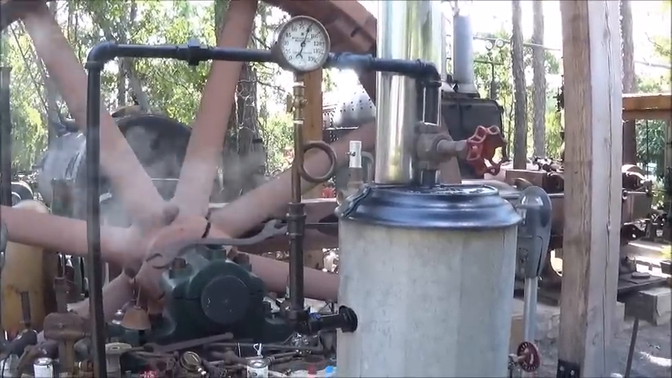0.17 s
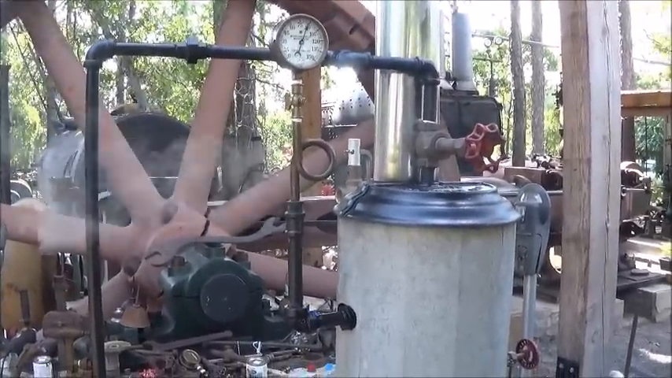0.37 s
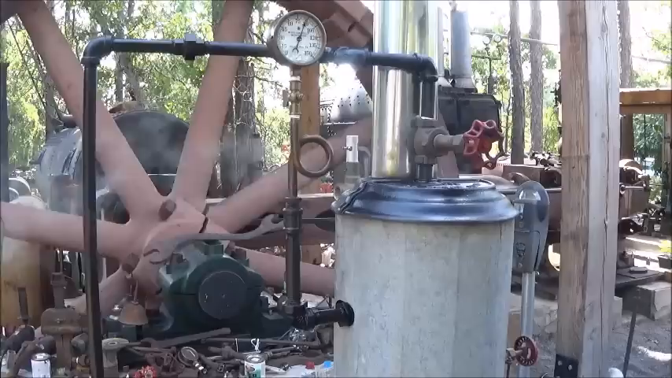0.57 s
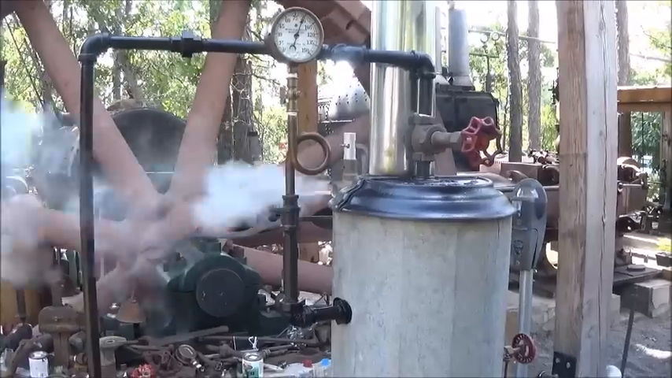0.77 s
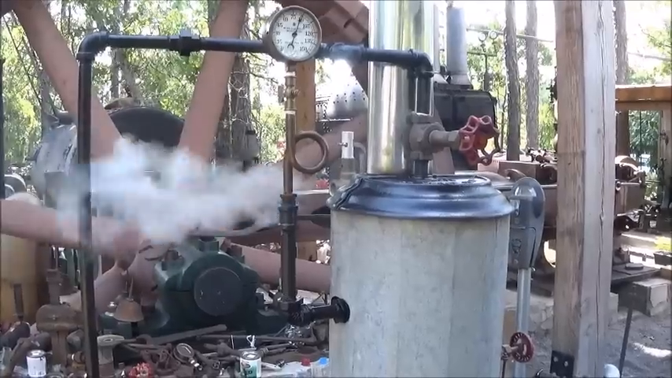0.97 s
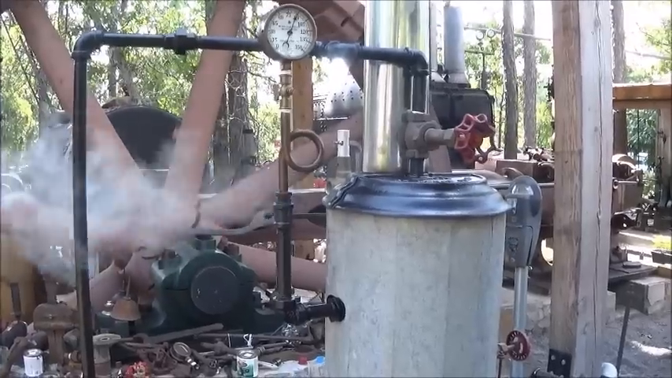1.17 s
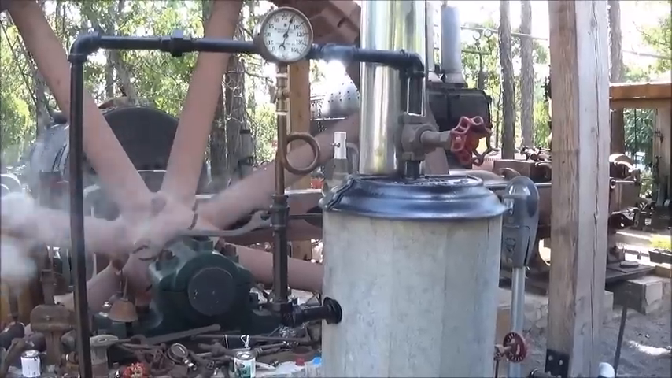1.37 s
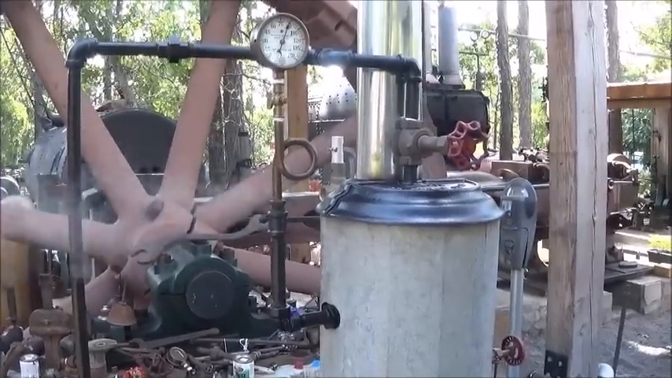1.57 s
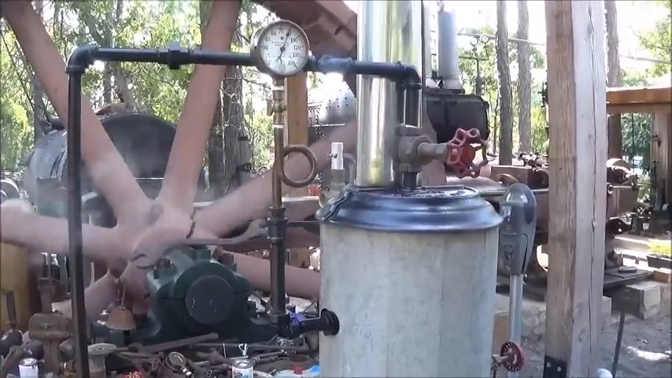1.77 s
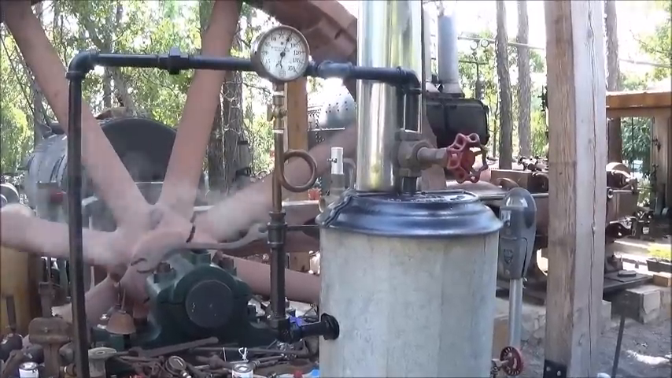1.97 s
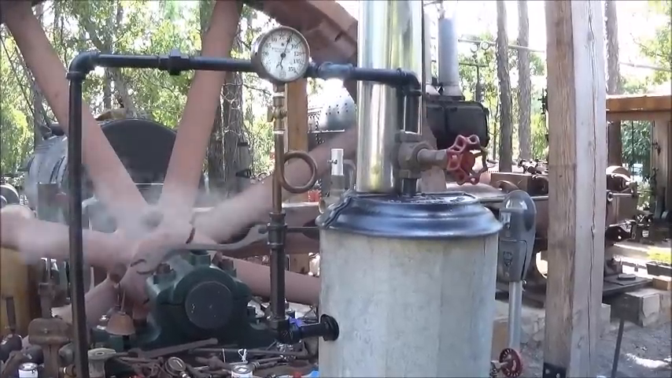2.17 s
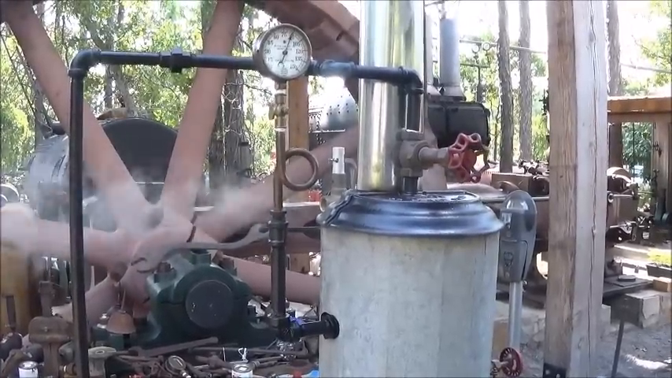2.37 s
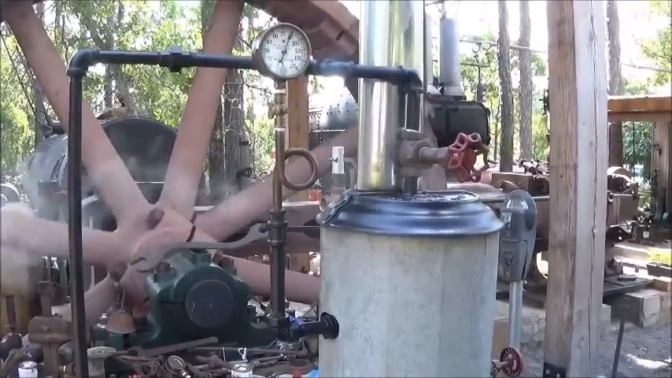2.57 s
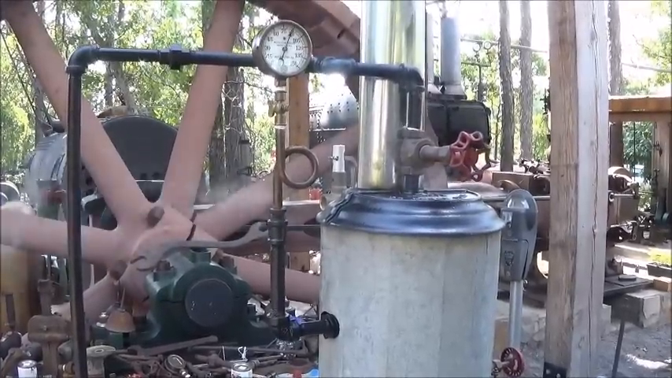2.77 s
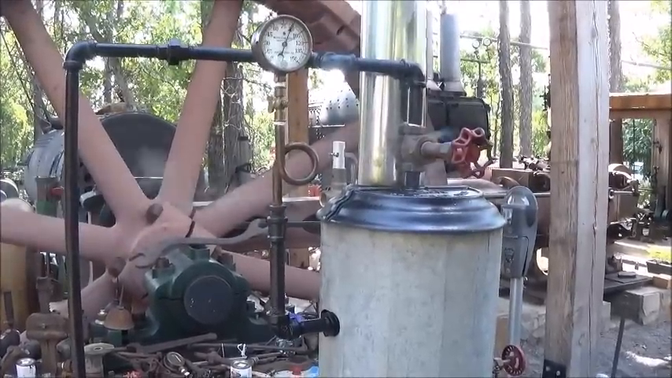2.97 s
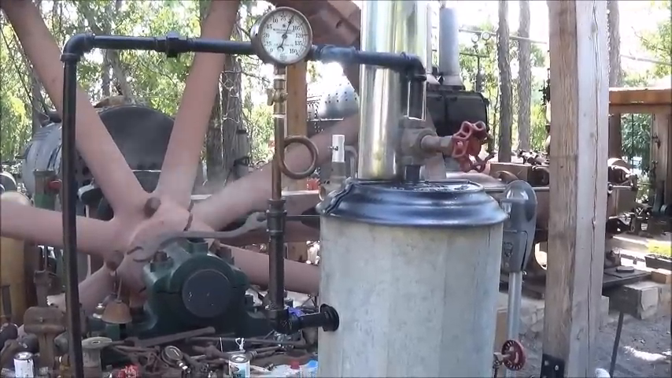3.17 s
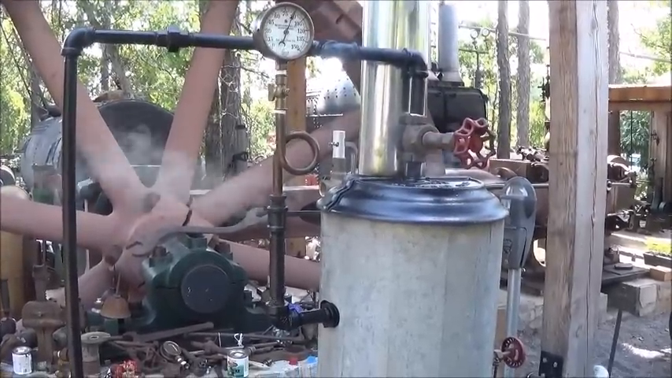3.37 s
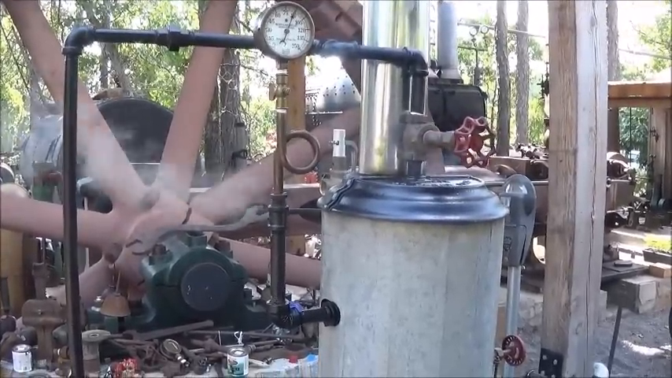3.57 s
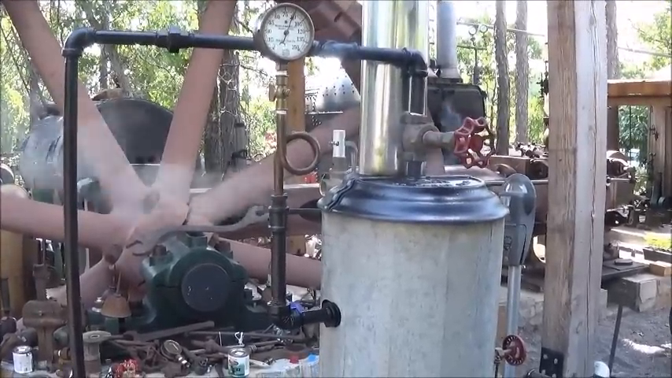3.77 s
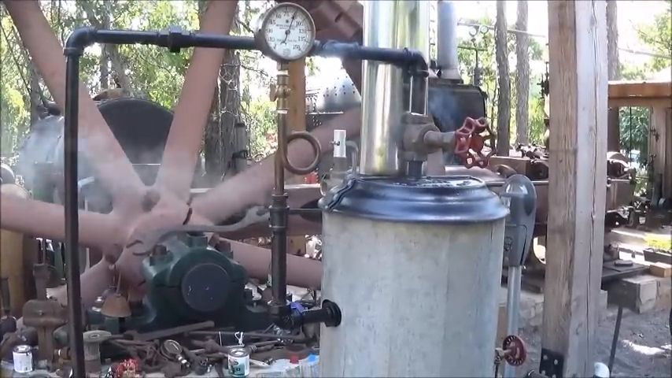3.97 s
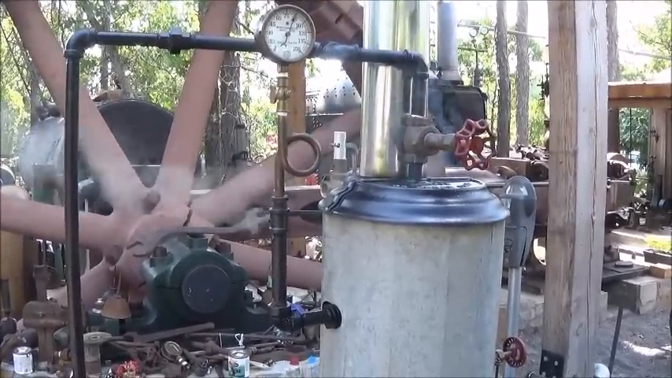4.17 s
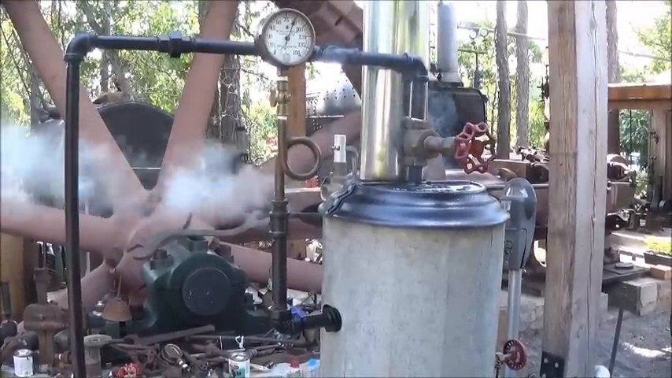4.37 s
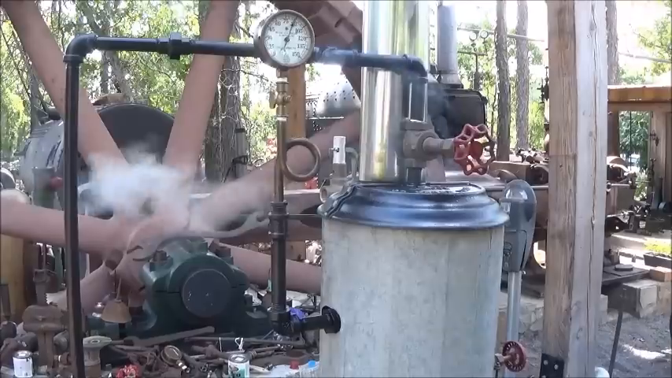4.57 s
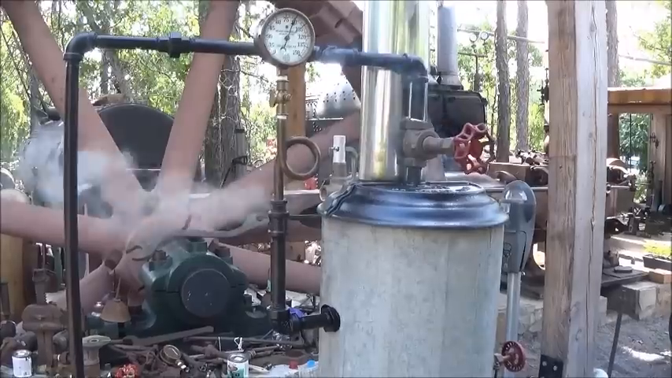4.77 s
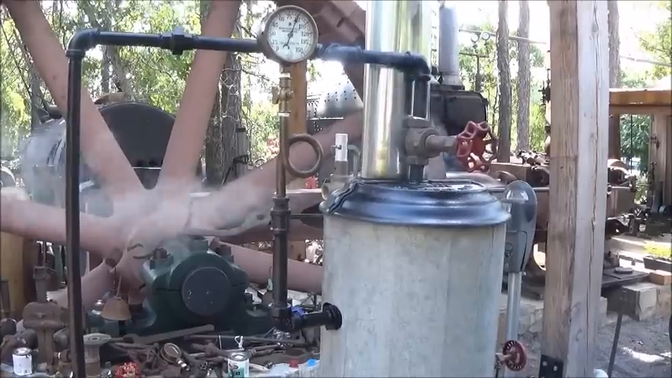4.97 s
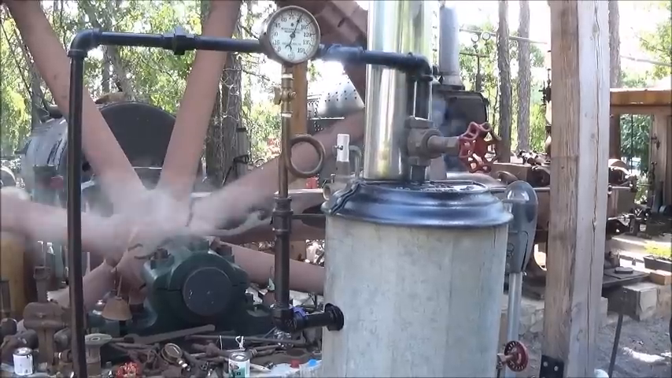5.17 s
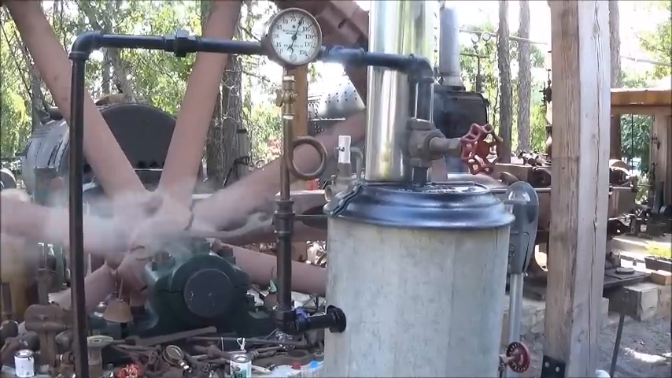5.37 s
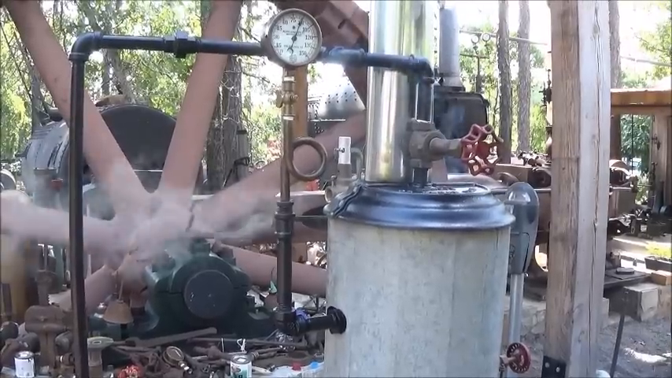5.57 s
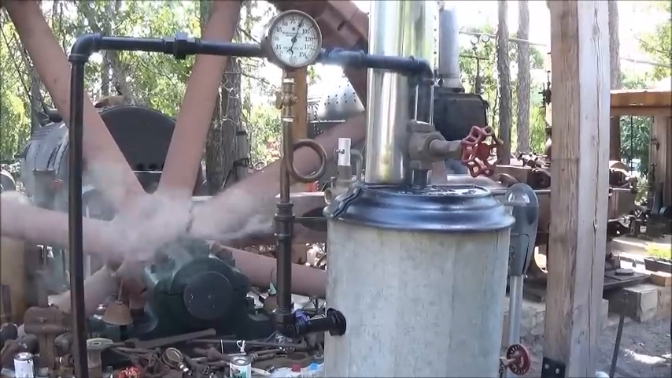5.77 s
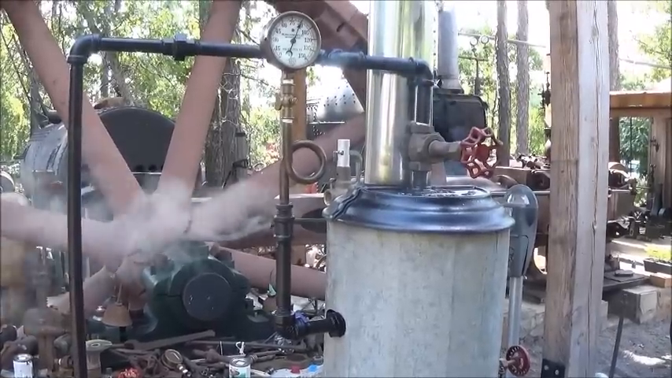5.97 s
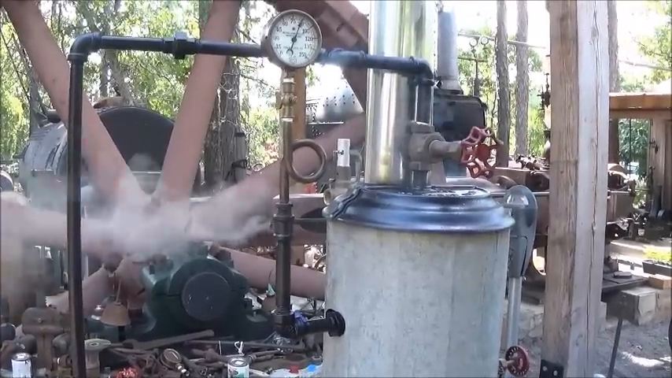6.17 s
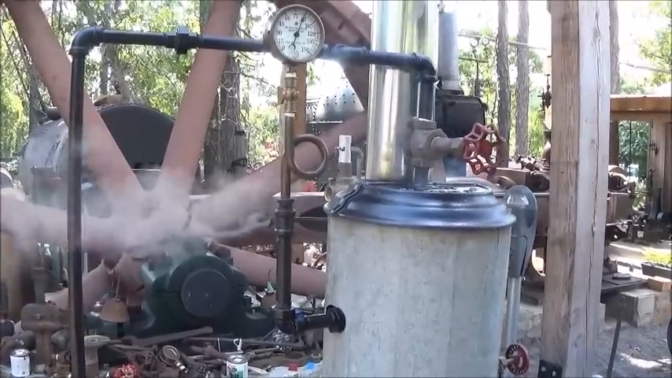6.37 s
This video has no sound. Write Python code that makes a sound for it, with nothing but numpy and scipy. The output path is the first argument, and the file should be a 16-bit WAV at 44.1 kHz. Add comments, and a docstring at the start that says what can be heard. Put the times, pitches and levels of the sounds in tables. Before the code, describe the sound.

Close stereo sound of pressurised steam rushing through a short pipe outdoors, dense and sizzling throughout. It starts drier, then a rapid cluster of popping, splashing spits wets the jet and adds airy fizz. The firebox roar swells briefly past the middle, followed by a loud double spit. Hiss continues to the end over a faint hum, with short echoes from nearby metal.

```python
"""In an open yard of old machines, a small boiler's safety valve blows steam through a short outlet pipe.
From the start filtered noise hisses in the pipe's resonances, over a soft fire of noise and a low hum of sines.
From 0.7 to 1 s five slugs of water spit out with cracks, splashes, puffs and rings, and fine spray then sizzles.
The fire's roar swells near 3.8 s, and two more slugs leave at 4.3 s.
Metal close by throws back quick echoes, and two close microphone ports hear it all."""
import sys
import numpy as np
from scipy import signal
from scipy.fft import rfft, irfft
from scipy.io import wavfile
from scipy.ndimage import uniform_filter1d

SR = 44100
rng = np.random.default_rng(int(sys.argv[2]) if len(sys.argv) > 2 else 0)


def bounce(signal):
    """Save signal as a 16-bit WAV file at the path given by the first command-line argument."""
    frames = np.transpose(np.atleast_2d(signal))
    limited = np.clip(frames, -1, 1)
    pcm = np.round(limited * 32767).astype(np.int16)
    wavfile.write(sys.argv[1], SR, pcm)


N = 283122
TIME = np.arange(N) / SR
BINS = np.fft.rfftfreq(N, 1 / SR)

# the boiler's rumble and hum, before the trim of each: t/s, level/dB
DRONE = [(0, -44), (1.2, -44), (1.9, -45.5), (2.2, -41), (3.1, -47), (4.5, -44), (5.1, -45), (5.8, -47),
         (6.42, -39)]
# slugs of water leaving the outlet: t/s, crack level/dB, splash level/dB, gurgle and ring level/dB,
# puff level/dB, time to clear the pipe/s, middle of the splash f/Hz
SLUGS = [(0.698, -17, -38, -49, -40, 0.0056, 2600), (0.7567, -15.5, -17.5, -34, -23, 0.021, 4230),
         (.793, -21, -21.5, -29, -35, 0.018, 3200), (.9455, -15.5, -20, -38, -23, 0.0042, 2300),
         (.992, -16.5, -32.5, -38, -35.5, 0.0059, 1700), (4.305, -11, -24.5, -28.5, -18, .021, 1970),
         (4.352, -20, -36, -35, -41, .005, 1500)]


def amp(db):
    """Decibels to gain."""
    return 10 ** (np.asarray(db) / 20)


def unit(x):
    """Scales to rms 1."""
    return x / np.sqrt(np.mean(np.abs(x) ** 2) + 1e-20)


def read(points, hz):
    """Reads a spectrum on a log-frequency axis."""
    f, value = np.transpose(points)
    return np.interp(np.log(hz + 1), np.log(f + 1), value)


def follow(table, t):
    """Every column of a curve table at the times t."""
    s, *columns = np.transpose(table)
    return [np.interp(t, s, column) for column in columns]


def bell(f, hz, width):
    """Gain of a resonance, half its peak at the edges of the width."""
    return 1 / (1 + (2 * (f - hz) / width) ** 2)


def waver(rate_hz):
    """Slow chance of rms 1, up to about the given rate."""
    spectrum = rfft(rng.standard_normal(N))
    return unit(irfft(spectrum / (1 + (BINS / rate_hz) ** 4), N))


def patches(shape, count, size):
    """Random patches of rms 1, count frames long and size bins wide."""
    over_time = uniform_filter1d(rng.standard_normal(shape), count, axis=0)
    return unit(uniform_filter1d(over_time, size, axis=1))


def jet(rush_db=-27.0, sizzle_db=-24.5, fizz_db=-29.5, patchy_db=1.13, flutter_db=.5, gust_db=1.0,
        tremble_db=0.2, rush_per_third=-.3, bright_per_third=0.55, fizz_per_spray=0.81, pipe_choke=1.0):
    """Turbulence at the valve seat: a broad rush, the pipe's resonances and a sizzle of droplets."""
    # resonances of the outlet pipe once wet: f/Hz, width/Hz
    pipe = [(1782, 220), (4790, 900), (8314, 1400), (13700, 950)]
    # their usual levels before the swells: level/dB
    pipe_db = [-35.5, -27.5, -22.5, -33]
    # spectrum shapes of the rush, the coarse spray and the fine spray: f/Hz, relative level/dB per Hz
    rush_colour = [(150, -17.5), (400, -15.5), (700, -12.5), (1200, -10), (1330, -11.5), (1500, -1.5),
                   (2400, 1.5), (3500, -4.5), (6000, -4), (7000, -9), (16000, -39)]
    sizzle_colour = [(6000, -32), (8000, -2), (9300, -2.5), (10100, 4.5), (11000, 4), (11900, 1.5),
                     (12500, -1), (13600, -12), (16000, -24)]
    fizz_colour = [(9000, -30), (11500, -9), (12600, -2), (13800, -2), (14500, 0), (15200, 2.5), (15800, 0)]
    # fine spray carried by the steam, before the share each layer takes: t/s, level/dB against the usual
    fine_spray = [(0.0, -11), (0.82, -14), (0.88, 1), (1.06, -3.8), (1.12, 7), (1.62, 1), (1.78, 7),
                  (2.04, 0), (2.5, 6), (2.86, 2), (4.0, 8.5), (4.68, 1), (4.78, 7), (5.08, -4.5), (5.34, 7),
                  (5.52, -4.5), (5.58, 5), (6.4, 6)]
    # swell of the coarse sizzle: t/s, level/dB against the usual
    sizzle_curve = [(0, -1.0), (0.18, -5), (1.1, -4.5), (1.19, 0.8), (1.62, -1.2), (1.76, 1.5),
                    (2.02, -0.5), (2.5, 2.0), (2.7, -1), (3.3, -1), (3.7, 1), (4.05, -0.8), (4.18, -1),
                    (4.83, 2), (5.12, -2.3), (5.32, 0.6), (6.42, 1.5)]
    # swell of the pipe's second resonance: t/s, level/dB against the usual
    second_curve = [(0, 2.2), (0.6, 0.5), (0.87, -3.7), (1.5, -2), (2.17, 1.5), (2.38, -3.5), (2.46, -2.5),
                    (3.05, -0.2), (3.5, -0.5), (3.72, -2.2), (4.22, 0), (4.7, -0.7), (5.2, -2.5), (5.8, -1),
                    (6.12, -2.5), (6.42, 1.5)]
    # swell of the pipe's third and strongest resonance: t/s, level/dB against the usual
    third_curve = [(0, 1.3), (0.6, 0.1), (1.25, 0), (1.45, 0.6), (1.95, -0.8), (2.28, 1), (2.45, -0.2),
                   (3.6, -1.4), (4.15, -0.6), (4.38, -1.5), (4.8, -3.5), (4.92, 2), (5.2, 0), (5.5, 0.9),
                   (5.92, 0.3), (6.07, -5), (6.2, 0), (6.42, -4.5)]
    # the steam is dry until the first slugs wet the pipe: weaker, brighter rush and higher resonances
    wetting_s, wetting_spread_s = 1, 0.6
    dry_rush_db, dry_bright_db, dry_sharpening = -3, 14, .018
    # dB that the lowest resonance gains per dB of sizzle, and the top one per dB of spray
    first_per_sizzle, top_per_spray = 0.46, 0.43

    f = np.fft.rfftfreq(512, 1 / SR)
    t = (np.arange(N // 128 + 3) * 128 / SR)[:, None]  # one row per short frame
    curves = (fine_spray, sizzle_curve, second_curve, third_curve)
    spray, sizzle, second, third = (follow(curve, t)[0] for curve in curves)
    choke = choking(t)
    dryness = .5 - .5 * np.tanh((t - wetting_s) / wetting_spread_s)

    def flutter(count):
        """Random level sway shared by all bins."""
        return patches((len(t), 1), count=count, size=1)

    # the rush is thinner and brighter when the steam is dry or the third resonance takes over
    rush = rush_db + dry_rush_db * dryness + rush_per_third * third + tremble_db * flutter(count=30)
    bright = dry_bright_db * dryness + bright_per_third * third
    tilt = bright * read([(3500, 0.0076), (5800, 0.51)], f)
    power = (unit(amp(read(rush_colour, f))) * amp(rush + tilt)) ** 2

    # coarse spray sizzles, fine spray fizzes above it
    fizz = fizz_per_spray * spray + fizz_db
    for colour, level in ((sizzle_colour, sizzle + sizzle_db), (fizz_colour, fizz)):
        power += (unit(amp(read(colour, f))) * amp(level)) ** 2

    # each resonance flares on its own as the valve disc trembles, and is damped while a slug fills the pipe
    swells = (first_per_sizzle * sizzle, second, third, top_per_spray * spray)
    for (hz, width), db, swell in zip(pipe, pipe_db, swells):
        level = db + swell + pipe_choke * np.minimum(choke, 0) + flutter_db * flutter(count=14)
        resonance = bell(f, hz * (1 + dry_sharpening * dryness), width)
        power += (unit(resonance) * amp(level)) ** 2

    # quick gusts of spray and slugs of water sway the treble most
    gusts = gust_db * flutter(count=17) * read([(8500, 0), (11000, .7), (13000, 1.5)], f)
    power *= amp(gusts + choke * read([(7500, 0), (10500, 1)], f)) ** 2

    eddies = rng.standard_normal(power.shape) + 1j * rng.standard_normal(power.shape)
    field = eddies * np.sqrt(power) * amp(patchy_db * patches(power.shape, count=12, size=12))
    hiss = signal.istft(field.T, nperseg=512, noverlap=384)[1][:N]
    return unit(hiss) * np.sqrt(power.mean())


def fire(roar_db=-0.5, flicker_db=1.4, rumble_db=-2):
    """The draught through the firebox: a soft roar that surges over a deeper rumble."""
    # spectrum shapes of the roar and the boiler's deep rumble: f/Hz, relative level/dB per Hz
    roar_colour = [(60, -30), (110, -15), (150, 0), (195, 2.5), (240, -1), (300, -5.5), (380, -3.5),
                   (460, -8.5), (530, -11.5), (900, -15), (2500, -62)]
    rumble_colour = [(12, -22), (25, -13), (40, -3), (62, 7.5), (78, -4.5), (100, 8), (122, -9.5),
                     (150, -25), (220, -15), (265, 1), (330, -10), (1000, -48)]
    # the roar before its flicker and trim: t/s, level/dB
    roar_curve = [(0, -42.5), (0.45, -42.1), (0.65, -37), (1.25, -39.5), (1.7, -38), (1.95, -41.9),
                  (2.42, -42), (2.62, -39), (3.1, -44.5), (3.5, -41.5), (3.8, -31.5), (4.05, -42),
                  (4.6, -44), (5.8, -54), (6.42, -47)]

    def draught(colour):
        """Steady noise of the given colour."""
        return unit(irfft(rfft(rng.standard_normal(N)) * amp(read(colour, BINS)), N))

    roar = draught(roar_colour)
    rumble = draught(rumble_colour)
    surge = follow(roar_curve, TIME)[0] + flicker_db * waver(4.3)
    return roar * amp(surge + roar_db) + rumble * amp(follow(DRONE, TIME)[0] + rumble_db)


def hum(unsteady_db=3, drift=0.99):
    """Low sines that waver in level and in phase (drift in radians)."""
    # the hum's tones: f/Hz, level/dB against the drone
    hum_tones = [(59.3, -8), (119.7, -7)]
    total = 0
    for hz, db in hum_tones:
        swell = amp(unsteady_db * waver(6.4))
        tone = np.sin(2 * np.pi * hz * TIME + drift * waver(2.1))
        total = total + amp(db) * unit(swell * tone)
    return total * amp(follow(DRONE, TIME)[0])


def choking(t):
    """Treble change in dB: a dip while a slug fills the pipe, a flare just after, most after the strongest puff."""
    choke_db_per_s, flare_db = 252, 5.5  # a longer slug chokes the jet more
    flare_lengths, flare_s = 2.3, .012  # clearing times from crack to flare, and half the flare's length
    strongest_db = max(slug[4] for slug in SLUGS)
    change = 0
    for s, _, _, _, puff_db, length, _ in SLUGS:
        dip = np.exp(-((t - s - length) / length) ** 2)
        flare = np.exp(-((t - s - flare_lengths * length) / flare_s) ** 2)
        change = change - choke_db_per_s * length * dip
        change = change + flare_db * amp(puff_db - strongest_db) * flare
    return change


def burst(shape, low_hz, high_hz):
    """A burst of noise in a band, of level 1 at the peak of its shape."""
    edges = np.clip([low_hz, high_hz], 50, SR / 2.5)
    band = signal.butter(2, edges, "band", fs=SR, output="sos")
    noise = signal.sosfilt(band, rng.standard_normal(len(shape)) * shape)
    return unit(noise) * np.sqrt(np.mean(shape ** 2)) / shape.max()


def add(mix, s, sound):
    """Mixes a sound in at time s."""
    part = mix[round(s * SR):][:len(sound)]
    part += sound[:len(part)]


def spits(splash_sharpness=2.0, ring_rise_s=0.0035):
    """Each slug cracks at the pipe's mouth, splashes and gurgles; steam follows with a puff and the pipe rings."""
    # the outlet pipe rings when a slug leaves it: f/Hz, level/dB against the gurgle, t60/s
    ring_modes = [(446, -2, 0.13), (663, 1.5, 0.09), (1043, 2.5, .11), (1325, -1.5, 0.23)]
    crack_hz, crack_width_hz, crack_rise_s, crack_decay_s = 1810, 690, 0.0001, 0.0029
    splash_spread = 2.4  # ratio from the middle of the splash to its edges
    splash_peak_share = 0.58  # clearing times to the splash's peak
    gurgle_low_hz, gurgle_high_hz, gurgle_lengths = 306, 1300, 0.56  # peaks after this many clearing times
    # a longer slug gives a deeper puff: the pitch for no length, and its fall per second of clearing time
    puff_hz, puff_sag_hz_per_s, puff_decay_s = 171, 1650, 0.013

    out, t = np.zeros(N), np.arange(SR // 4) / SR

    def strike(rise, decay):
        """Quick onset and exponential decay."""
        return (1 - np.exp(-t / rise)) * np.exp(-t / decay)

    def hump(peak_s):
        """Rounded swell that peaks at peak_s."""
        return t / peak_s * np.exp(-t / peak_s)

    for s, crack_db, splash_db, gurgle_db, puff_db, length, splash_hz in SLUGS:
        crack_shape = strike(crack_rise_s, crack_decay_s)
        crack = burst(crack_shape, crack_hz - crack_width_hz / 2, crack_hz + crack_width_hz / 2)
        splash_shape = hump(splash_peak_share * length) ** splash_sharpness
        splash = burst(splash_shape, splash_hz / splash_spread, splash_hz * splash_spread)
        gurgle = burst(hump(gurgle_lengths * length), gurgle_low_hz, gurgle_high_hz)
        add(out, s, amp(crack_db) * crack + amp(splash_db) * splash + amp(gurgle_db) * gurgle)

        # once the slug has cleared the pipe
        pitch_hz = puff_hz - puff_sag_hz_per_s * length
        puff = np.sin(2 * np.pi * pitch_hz * t) * np.exp(-t / puff_decay_s)
        ring = 0
        for hz, db, t60 in ring_modes:
            mode = np.sin(2 * np.pi * (hz * t + rng.random()))
            ring = ring + amp(db) * mode * strike(ring_rise_s, t60 / np.log(1000))
        add(out, s + length, amp(puff_db) * puff + amp(gurgle_db) * ring)
    return out


def scatter(first_s, fade_s, count):
    """Response of many faint reflections of random sign, energy about 1."""
    taps = np.zeros(N)
    delay = first_s + fade_s * rng.exponential(1, count)
    taps[(delay * SR).astype(int) % N] = rng.choice([-1., 1.], count)
    return rfft(taps) / np.sqrt(count)


def yard(x, dull_hz=10000, ripple_width_hz=45, clutter=0.25):
    """Quick echoes from boiler, flywheel and posts comb the sound; the highest treble comes back weakly."""
    # echoes from the machines nearby: delay/ms, signed strength below the dulling
    echoes = [(7.433, 0.067), (7.765, -0.048), (7.876, 0.062), (9.388, -0.084), (11.138, -0.027),
              (13.256, 0.13), (13.593, -0.00066)]
    # narrow peaks and notches in the colour of the hiss: f/Hz, level/dB of each bell alone
    ripple = [(1561, -7.5), (1647, 1), (1733, -6.5), (1809, 3.5), (1895, -10), (2121, -9), (2272, -0.5),
              (2369, -6.5), (2562, -13), (4050, 4.5), (4134, -3), (4253, -0.5), (4468, 7), (4533, -0.5),
              (4608, 1), (4662, -5.5), (5319, -3.5), (5383, 5.5), (7321, -3), (7515, 7.5), (8170, 1),
              (8613, -11.5), (10077, -1)]
    near = sum(gain * np.exp(-2j * np.pi * BINS * ms / 1000) for ms, gain in echoes)
    reflections = near + clutter * scatter(.004, .016, count=200)
    response = 1 + reflections / (1 + (BINS / dull_hz) ** 8)
    colour = amp(sum(db * bell(BINS, hz, ripple_width_hz) for hz, db in ripple))
    return irfft(rfft(x) * response * colour, N)


def ports(x):
    """Two close ports hear nearly the same; their resonances and the scattered sound set them apart."""
    # resonances in which the two microphone ports differ: f/Hz, width/Hz, strength, phase/radians
    port_modes = [(1830, 53, 0.93, -0.5), (8530, 90, 0.31, -0.018)]
    # sound that arrives from all sides: f/Hz, level/dB against the direct sound
    diffuse_colour = [(30, -40), (100, -29), (400, -19), (800, -14), (1100, -16), (1950, -11), (2850, -24),
                      (3700, -17), (4300, -23), (6500, -28), (8000, -23), (9200, -18), (10300, -34),
                      (15000, -36)]
    direct = 0
    for hz, width, strength, phase in port_modes:
        direct = direct + strength * np.exp(1j * phase) / (1 + 2j * (BINS - hz) / width)
    diffuse = amp(read(diffuse_colour, BINS)) * scatter(.002, .02, count=300)
    side = irfft(rfft(x) * (direct + diffuse), N)
    return np.array([x + side, x - side])


def scene(steam_db=-0.12):
    """Steam and spits among the machines, over fire and hum."""
    outlet = amp(steam_db) * jet() + spits()
    return ports(yard(outlet) + fire() + hum())


def record(dry):
    """The recorder's band limit: a steep low-pass filter."""
    edge_hz = 15760
    lowpass = signal.firwin(1023, edge_hz, window=("kaiser", 8), fs=SR)
    return signal.oaconvolve(dry, lowpass[None], "same")


dry = scene()
out = record(dry)
bounce(out)
```